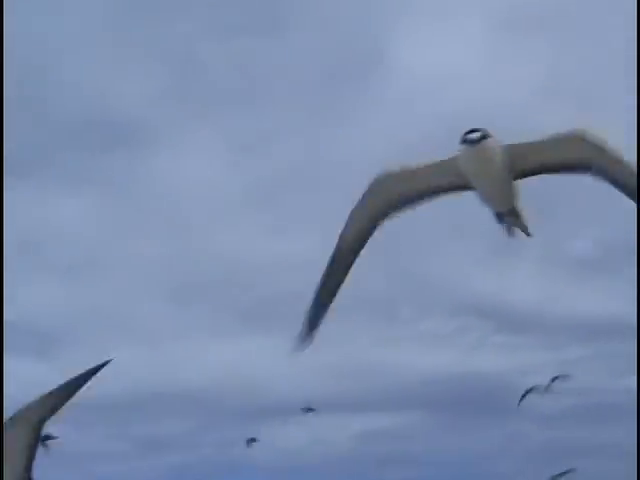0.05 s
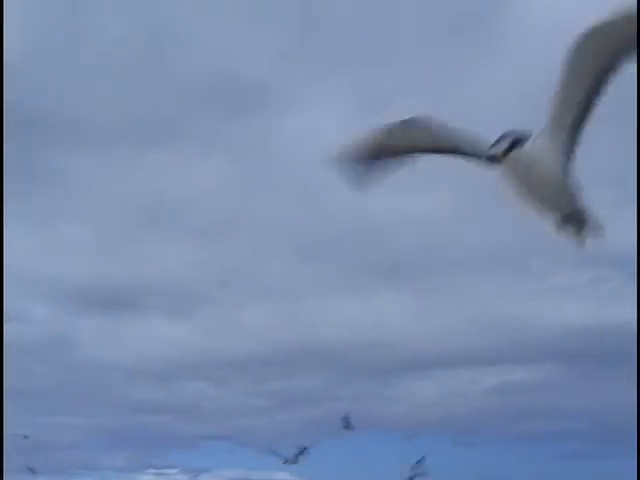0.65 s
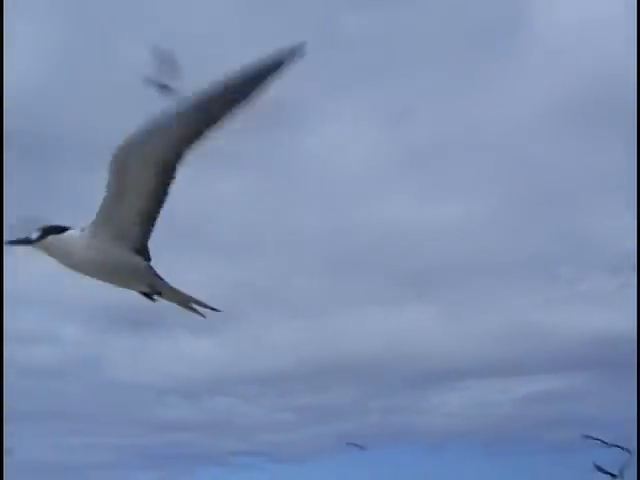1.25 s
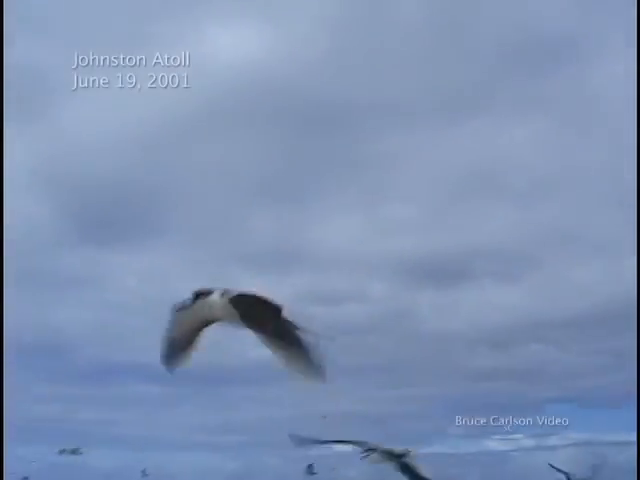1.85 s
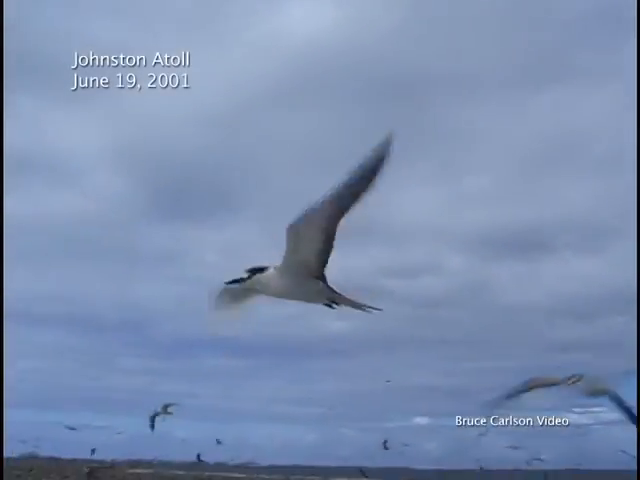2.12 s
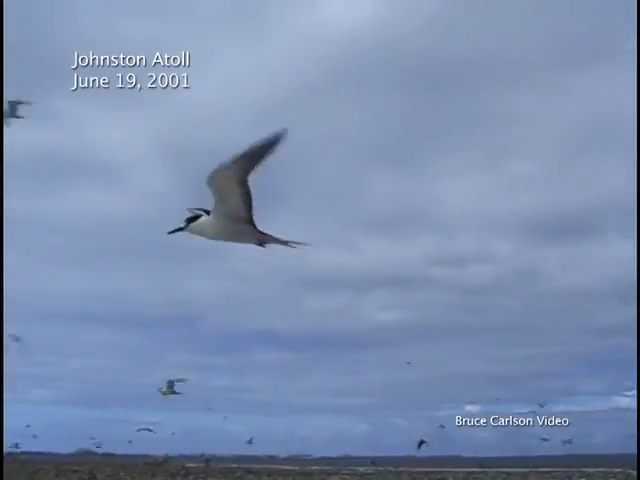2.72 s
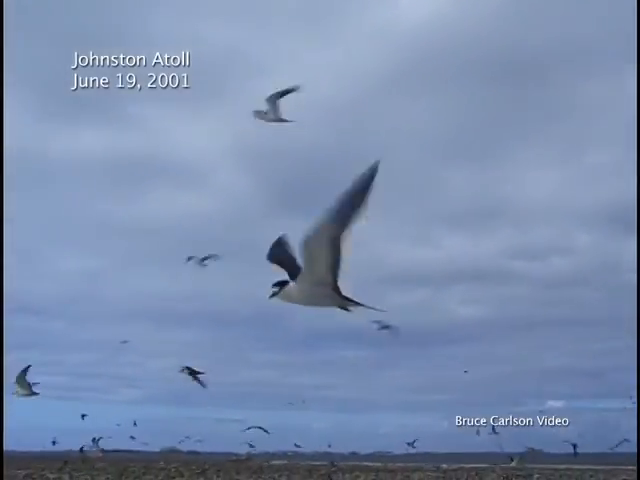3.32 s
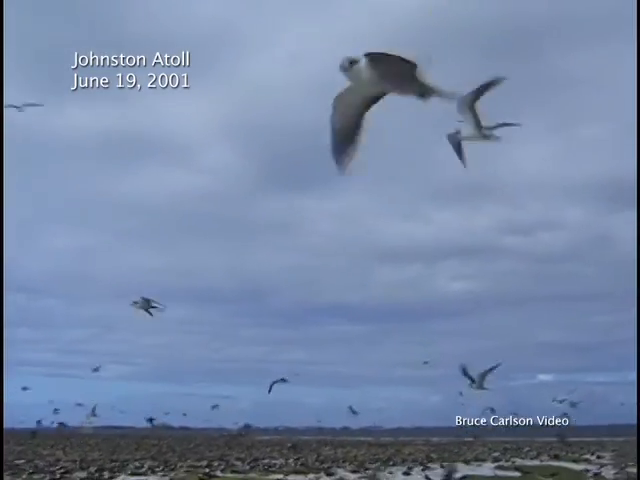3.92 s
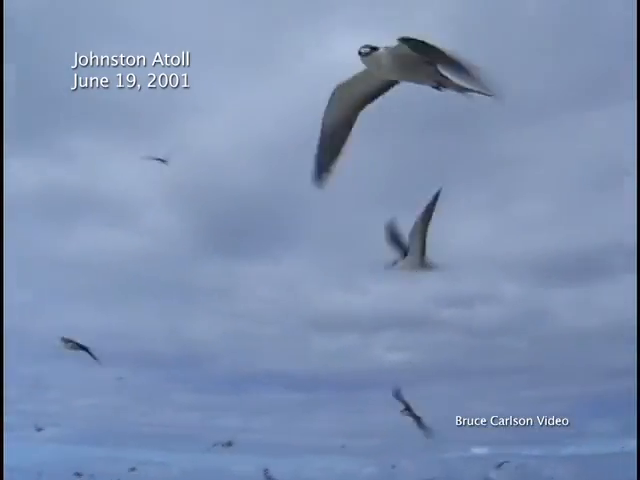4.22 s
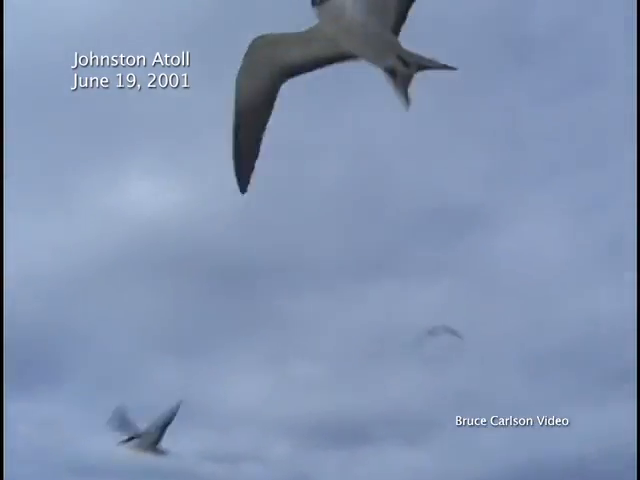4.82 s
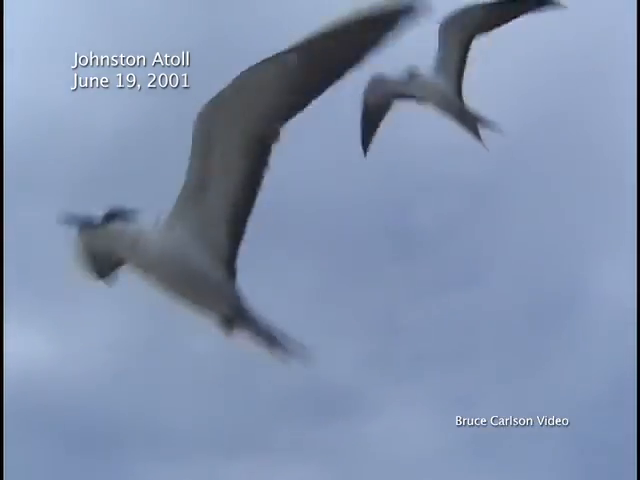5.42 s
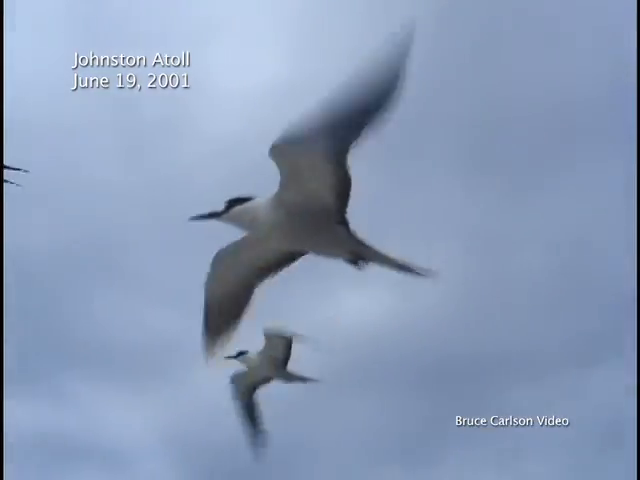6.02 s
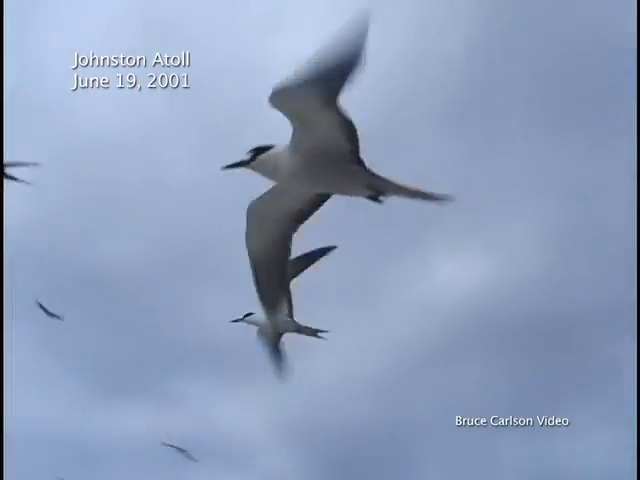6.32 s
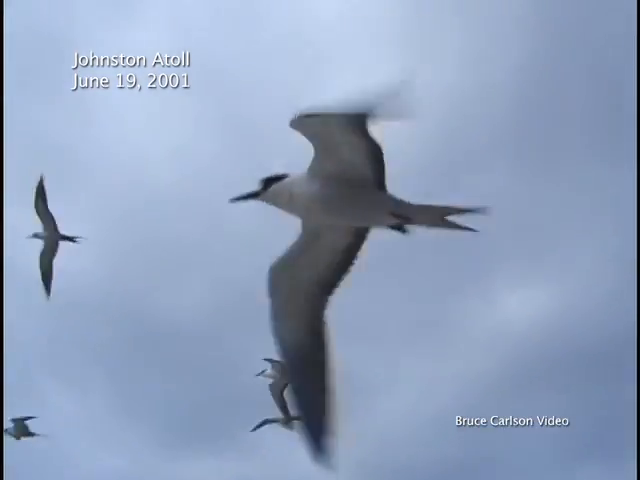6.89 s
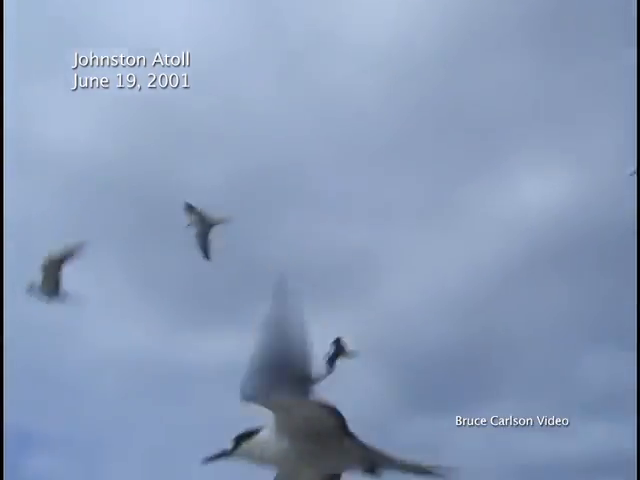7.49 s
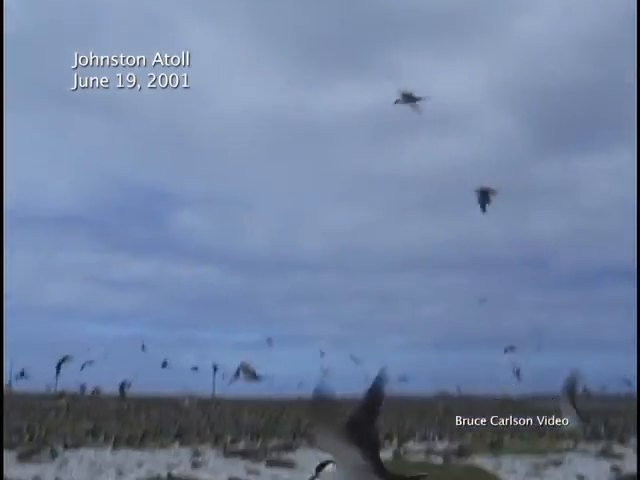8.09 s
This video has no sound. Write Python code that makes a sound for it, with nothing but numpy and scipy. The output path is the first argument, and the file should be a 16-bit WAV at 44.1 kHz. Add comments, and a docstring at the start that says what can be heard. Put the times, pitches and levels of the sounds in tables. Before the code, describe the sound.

A crowded seabird colony chatters shrilly throughout, heard in the open air with almost no echo. Short, mostly rising hoots come from the nesting ground while terns near the microphone give sharp, nasal yelps that crack into rasps. One hoarse squawk leads into a rapid burst of calls, and after a calmer stretch louder cries return overhead. Soft, uneven wind sits beneath the birds.

```python
"""A tern colony on an open beach. From the start, hundreds of birds blend into a shrill chorus, light wind
brushes the microphone, far hoots murmur and near terns give nasal, gliding 'wide-a-wake' cries.
From 0.5 s nearer hoots rise from the nesting ground; from 1.3 s birds wheel right overhead, calling in
bouts; at 2.8 s comes one harsh squawk. Each voice is a syrinx buzz shaped by throat resonances."""
import sys
import numpy as np
from scipy import signal
from scipy.fft import rfft, irfft, next_fast_len
from scipy.io import wavfile
from scipy.ndimage import uniform_filter1d

SR = 44100
rng = np.random.default_rng(int(sys.argv[2]) if len(sys.argv) > 2 else 0)


def wav_record(signal):
    """Record a signal, one row per channel, as 16-bit PCM in the file named by sys.argv[1]."""
    frames = np.transpose(np.atleast_2d(signal))
    bounded = np.clip(frames, -1, 1)
    # unit amplitude maps onto the largest positive 16-bit level
    quanta = np.round(bounded * 32767).astype(np.int16)
    wavfile.write(sys.argv[1], SR, quanta)


N = 359415
TIME = np.arange(N) / SR

# tern throat heard from far off: f/Hz, gain/dB
DISTANT_THROAT = [(500, -16.5), (1000, -38), (1320, -7.5), (1600, -31.5), (1950, -2.5), (2550, 4.5),
                  (3100, -4.5), (3800, -13), (4900, -14.5), (6200, -20), (7400, -22.5), (9500, -36.5),
                  (12500, -43), (15000, -96)]
# band that a bird's treble lifts: f/Hz, share/0-1
TREBLE_SHARE = [(3000, 0.01), (4800, 0.68), (7800, 0.87), (10000, 0.88)]


def undb(db):
    """Decibels to gain."""
    return 10 ** (np.asarray(db) / 20)


def unit(x):
    """Scale to rms 1."""
    return x / np.sqrt(np.mean(x ** 2) + 1e-18)


def curves(table, t=TIME):
    """Each column of a timed table, interpolated at times t."""
    times_s, *columns = np.transpose(table)
    return [np.interp(t, times_s, column) for column in columns]


def add(track, start_s, x):
    """Mix x into a track from start_s on."""
    i = int(start_s * SR)
    a, b = max(i, 0), min(i + len(x), N)
    if b > a:
        track[a:b] += x[a - i:b - i]


def walk(n, rate_hz):
    """Smooth random drift, spread near 1."""
    u = np.arange(n) * rate_hz / SR
    knots = int(u[-1]) + 2
    return 1.177 * np.interp(u, np.arange(knots), rng.standard_normal(knots))


def bump(hz, centre_hz, width_hz):
    """Resonance curve, 1 at its centre."""
    return 1 / (1 + (2 * (hz - centre_hz) / width_hz) ** 2)


def steady(x, span_s=.1):
    """Hold the slow level near rms 1, leaving the quick flicker."""
    power = np.maximum(uniform_filter1d(x ** 2, int(span_s * SR)), 0)
    return x / np.sqrt(power + np.mean(power) / 20)


def colour(x, shape, scale=1, ripple_db=0, extra_db=lambda hz: 0):
    """Filter by a shape (f/Hz, gain/dB), f times scale; ripple gives each throat its own peaks."""
    n = next_fast_len(len(x) + 256, True)
    hz = np.arange(n // 2 + 1) * SR / n + 1
    knots_hz, knots_db = np.transpose(shape)
    ripple = np.interp(hz, np.linspace(0, SR / 2, 40), rng.standard_normal(40))
    ripple *= np.clip(hz / 3500, .5, 1.3)
    shape_db = np.interp(np.log(hz), np.log(knots_hz * scale), knots_db)
    gain = undb(shape_db + ripple_db * ripple + extra_db(hz))
    # resonances delay some harmonics, spreading each pulse over its cycle
    lag_s = .0012 * np.interp(hz, np.linspace(0, SR / 2, 30), rng.random(30))
    dispersion = np.exp(-2j * np.pi * np.cumsum(lag_s) * SR / n)
    return irfft(rfft(x, n) * gain * dispersion, n)[:len(x)]


def syrinx(length_s, pitches_hz, rough, fade_s=.005, jitter=.036, breathy=.18, wobble=.009):
    """One buzzing syllable on an arched glide; roughness shakes pulse period and size and adds breath."""
    n = int((max(length_s, .01) + fade_s) * SR)
    u = np.linspace(0, 1, n)
    start, middle, end = pitches_hz
    glide_hz = start + (end - start) * u + (4 * middle - 2 * start - 2 * end) * u * (1 - u)
    pitch_hz = glide_hz * (1 + rough * jitter * walk(n, 450) + wobble * walk(n, 69.87))
    half_phase = np.pi * np.cumsum(pitch_hz) / SR
    harmonics = int(SR / 3 / middle)
    pulses = np.sin((2 * harmonics + 1) * half_phase) / np.sin(half_phase) - 1
    flutter = 1 + rough * .6 * walk(n, 700)
    breath = rough * breathy * rng.standard_normal(n) * (1 + np.cos(2 * half_phase))
    envelope = signal.windows.tukey(n, min(2 * fade_s * SR / n, 1)) * (1 - .5 * u ** 4)
    voice = (unit(pulses) * flutter + breath) * envelope
    return np.pad(voice, (0, SR // 250))  # time for the throat to ring out


def flock(count=300, pitch_spread=.14, throat_spread=.058, distance_db=2.6, stutter_db=3):
    """Many birds vary one three-part cry, each with its own pitch, pace, throat and distance."""
    # cry before each bird's stretch and shift: t/s, length/s, start f/Hz, middle f/Hz, end f/Hz, level/dB
    phrase = [(0, 0.089, 657.7, 736.2, 912.4, 6), (0.129, 0.085, 999.4, 872, 781.5, 2.5),
              (0.191, 0.11, 808.2, 838, 828.7, 3)]
    out = np.zeros(N)
    for k, (pitch, pace, throat, near) in enumerate(rng.standard_normal((count, 4))):
        begin_s = (k + rng.random()) / count * (N / SR + .3) - .3
        stretch = .85 * np.exp(.25 * pace)
        for offset_s, length_s, *pitches_hz, db in phrase:
            own_hz = np.array(pitches_hz) * np.exp(pitch_spread * pitch + .07 * rng.standard_normal(3))
            buzz = syrinx(length_s * stretch * .75, own_hz, rough=.3, wobble=.018)
            cry = colour(buzz, DISTANT_THROAT, np.exp(throat_spread * throat), ripple_db=4)
            level_db = db + distance_db * np.clip(near, -2, .4) + stutter_db * walk(len(cry), 80)
            add(out, begin_s + offset_s * stretch, unit(cry) * undb(level_db))
    return out


def churrs(count=45, pitch_hz=638, pitch_spread=.018, length_s=.13, distance_db=3):
    """Other birds of the crowd hold low, flat, nasal notes near one pitch."""
    out = np.zeros(N)
    for k, (pitch, slide, span, near) in enumerate(rng.standard_normal((count, 4))):
        own_hz = pitch_hz * np.exp(pitch_spread * (pitch + slide * np.array([-1, 0, 1])))
        buzz = syrinx(length_s * np.exp(span / 4), own_hz, rough=.41, fade_s=.02)
        note = colour(buzz, DISTANT_THROAT, ripple_db=3)
        start_s = (k + rng.random()) / count * N / SR - length_s
        add(out, start_s, unit(note) * undb(distance_db * np.clip(near, -2, 1)))
    return out


def chorus(body_gain_db=-.3, treble_gain_db=8.5, churr_db=3, blur_db=-11, split_hz=3800):
    """Flock and churrs over a blur of the farthest birds; swells and brightens as birds come closer."""
    # colony activity, before the gains: t/s, body level/dB, treble level/dB
    activity = [(0.0, -21.5, -34), (0.11, -25.5, -35.5), (0.27, -24, -35.5), (0.36, -35.5, -43),
                (0.5, -26, -37), (0.66, -24, -39), (1.11, -26, -41), (1.56, -23, -37), (1.85, -24.5, -39),
                (2.15, -24, -39.5), (2.45, -21.5, -42), (2.72, -22, -44), (3.11, -24, -27),
                (3.3, -27.5, -41.5), (3.6, -23.5, -40.5), (4.15, -31, -44.5), (4.34, -24, -38),
                (4.79, -26, -37.5), (5.01, -22, -32), (5.33, -21.5, -37), (5.74, -24, -33.5),
                (5.9, -26.5, -43.5), (6.58, -26, -34), (6.81, -22.5, -35), (7.0, -21.5, -36),
                (7.33, -23, -34.5), (7.42, -29.5, -45), (7.64, -28, -42.5), (8.15, -32.5, -40)]
    # narrow resonances through the whole chorus: f/Hz, width/Hz, gain/dB
    rings = [(1960, 14, -1.5), (2490, 46, 0.5), (4850, 58, 10.5)]
    body_db, treble_db = curves(activity)
    blur = undb(blur_db) * unit(colour(rng.standard_normal(N), DISTANT_THROAT))
    voices = steady(flock() + undb(churr_db) * churrs()) + blur
    for hz, width_hz, db in rings:
        ring = signal.lfilter(*signal.iirpeak(hz, hz / width_hz, fs=SR), voices)
        voices += (undb(db) - 1) * ring
    treble = signal.sosfiltfilt(signal.butter(2, split_hz, "high", fs=SR, output="sos"), voices)
    return (voices - treble) * undb(body_db + body_gain_db) + treble * undb(treble_db + treble_gain_db)


def wind(gain_db=-2.5, gust_db=2):
    """A light breeze rumbles unevenly on the microphone."""
    # rumble spectrum: f/Hz, relative density/dB
    spectrum = [(15, -25), (45, 3.5), (100, 2), (130, -2), (152, 3), (185, -5.5), (330, -7), (700, -18.5),
                (2000, -34), (12000, -75)]
    # breeze strength: t/s, level/dB
    breeze = [(0.0, -44), (0.45, -48), (2.31, -54.5), (2.52, -38), (2.63, -47), (3.33, -49), (3.81, -42),
              (4.02, -49), (4.45, -36), (4.74, -45.5), (4.9, -37.5), (5.2, -45.5), (6.76, -45.5),
              (6.83, -35.5), (6.88, -47), (7.15, -40.5), (7.47, -53.5), (7.88, -48), (7.94, -38),
              (8.15, -39)]
    rumble = unit(colour(rng.standard_normal(N), spectrum))
    return rumble * undb(curves(breeze)[0] + gain_db + gust_db * walk(N, 13))


def hoots(far_count=150, arch=.02045, swell_db=3):
    """Low, hoarse calls from the nesting ground, mostly rising: near ones swell over many far ones."""
    # near hoots: t/s, length/s, start f/Hz, end f/Hz, level/dB
    calls = [(.55, 0.099, 464, 542, -41), (0.801, .12, 422, 568, -35.5), (0.898, .09, 541, 673, -44),
             (1.11, 0.056, 443, 547, -42.5), (1.669, 0.098, 439, 538, -41.5), (2.192, 0.084, 432, 550, -37),
             (2.33, 0.074, 490, 533, -35), (2.4, .11, 451, 501, -38.5), (2.689, 0.077, 439, 504, -36.5),
             (2.783, .1, 478, 576, -32), (2.948, 0.07, 603, 489, -35), (3.23, 0.06, 444, 553, -39.5),
             (3.432, 0.11, 442.4, 553, -34.5), (3.542, 0.13, 506, 604, -33.5),
             (3.661, 0.043, 599, 448, -34.5), (3.821, 0.074, 572, 506, -38.5),
             (4.24, 0.079, 544, 477, -35.5), (4.331, 0.17, 528, 607, -35.5),
             (4.5, 0.077, 486, 544.4, -36.5), (4.66, 0.087, 401, 471, -38.5), (4.768, .11, 590, 564, -34.5),
             (5.277, 0.113, 640, 673, -35.5), (5.699, 0.12, 423, 547, -40.5),
             (5.919, 0.069, 512, 602, -39.5), (6.028, 0.088, 502, 580, -41), (6.249, .13, 577, 692, -36.5),
             (6.38, .14, 441.4, 586, -37), (6.788, .07, 444, 548, -37), (7.08, 0.067, 470, 519, -39.5),
             (7.19, 0.058, 438, 506, -39), (7.298, 0.084, 530, 567, -41), (7.849, 0.064, 450, 513, -39),
             (8.061, 0.093, 571, 672, -40)]
    # hooting throat: f/Hz, gain/dB
    throat = [(330, -25), (420, 3.5), (540, 1), (700, -3), (1000, -32), (1320, -8.5), (1600, -12),
              (1900, -14), (2600, -95), (4000, -16), (9000, -35.5)]
    # murmur of far hoots: t/s, level/dB
    murmur = [(0.0, -45.5), (0.7, -39.5), (1.05, -46), (1.79, -43.5), (2.45, -40.5), (3.15, -42.5),
              (4.4, -41.5), (5.5, -41), (7.1, -38.5), (7.55, -47), (8.15, -43)]
    near, far = np.zeros(N), np.zeros(N)
    for start_s, length_s, start_hz, end_hz, db in calls:
        pitches_hz = start_hz, (start_hz + end_hz) / 2 * (1 + arch), end_hz
        buzz = syrinx(length_s, pitches_hz, rough=1, fade_s=.015, jitter=.025, wobble=.018)
        hoot = colour(buzz, throat, ripple_db=2)
        push_db = np.interp(np.linspace(0, 1, len(hoot)), [0, .7, 1], [-4, 0, -1])
        hoot *= undb(push_db + swell_db * walk(len(hoot), 74.6))
        add(near, start_s - .007, unit(hoot) * undb(db))
    for k, (when, pitch, span, rise) in enumerate(rng.random((far_count, 4))):
        pitches_hz = (440 + 190 * pitch) * (1 + (.3 * rise - .12) * np.array([-1, 0, 1]))
        buzz = syrinx(.04 + .07 * span, pitches_hz, rough=1, fade_s=.02, wobble=.035)
        add(far, (k + when) / far_count * N / SR - .1, buzz)
    return near + unit(colour(far, throat)) * undb(curves(murmur)[0])


def near_terns(gain_db=1.13, bill_db=11, rise_db=5, quaver_db=1.8, pivot_hz=788):
    """Close birds: each harmonic flares as it glides through the bill resonance."""
    # syllables: t/s, length/s, pitch/Hz, glide/octaves, level/dB, bill resonance/Hz, treble/dB
    syllables = [(.01, 0.033, 959, 0.51, -24, 3240, -16), (0.047, 0.076, 1069, 0.21, -24, 3220, -1.5),
                 (0.156, 0.042, 944, -0.65, -25.5, 3100, 1), (0.195, 0.082, 943, 0.1, -28.5, 2530, -13),
                 (0.451, 0.09, 900, 0.2, -31, 2900, 5.5), (0.546, 0.07, 1200, 0.27, -30, 2400, 7),
                 (0.636, 0.11, 870, -0.13, -29.5, 2250, 5.5), (1.051, 0.031, 808, 0.44, -31, 2490, -1),
                 (1.487, 0.06, 653, 0.19, -27.5, 2420, 7), (1.547, 0.034, 1000, 0.14, -27, 2790, 5),
                 (1.631, 0.072, 666, 0.28, -23.5, 2380, -2), (1.706, 0.11, 727, 0.12, -25.5, 2900, 5),
                 (1.958, 0.076, 736, 0.71, -27, 2100, 1.5), (2.227, 0.076, 596, 0.24, -26.5, 2330, 3),
                 (2.28, 0.07, 767, 0.43, -23.5, 2630, 10), (2.358, 0.056, 800, 0.0048, -24, 2660, 6.5),
                 (2.416, 0.072, 701, 0.5, -23, 2570, 6), (2.497, 0.025, 896, -0.65, -25.5, 2420, 13.5),
                 (2.528, 0.064, 789, -0.025, -27.5, 2360, -3), (3.552, 0.065, 720, 0.37, -33, 3550, 10.5),
                 (3.865, 0.06, 954, 0.27, -32.5, 2950, -1), (4.12, 0.087, 794, 0.55, -30, 2140, -18),
                 (4.201, 0.034, 769, -0.031, -26.5, 3020, -1), (4.23, 0.073, 1020, 0.24, -27, 3050, -1),
                 (4.416, 0.093, 615, 0, -30, 2960, 4.5), (4.803, 0.042, 621, -0.13, -25, 2380, 5.5),
                 (4.892, 0.03, 900, 0.43, -27.5, 2520, 8), (4.951, 0.11, 641.5, 0.064, -22, 2300, -1.5),
                 (5.007, 0.054, 670, -0.11, -34, 3270, -4), (5.059, 0.054, 754, 0.47, -28, 2870, 0),
                 (5.134, 0.088, 674, -0.06, -31.5, 2470, 1), (5.157, 0.018, 772, 0.049, -23, 2340, -10),
                 (5.211, 0.028, 830, 0.76, -31.5, 3200, 3), (5.263, 0.084, 814, -0.055, -31, 2380, 7),
                 (5.325, 0.074, 668, 0.063, -28.5, 2530, -22), (5.577, 0.065, 747, 0.18, -27.5, 2280, -6),
                 (6.013, 0.088, 654, 0.19, -30.5, 1970, -26.5),
                 (6.219, 0.061, 620, -0.15, -29.5, 2600, 6.5), (6.314, 0.051, 634, 0.072, -29.5, 1887, 8),
                 (6.825, 0.048, 937, -0.7, -22.5, 2730, -4), (6.898, 0.037, 823, 0.037, -25, 3100, -6),
                 (7.045, 0.042, 814, 0.13, -31, 2410, -12), (7.14, 0.02, 818, -0.15, -23.5, 2480, -20),
                 (7.333, 0.046, 866, 1, -23.5, 3080, 1)]
    # throat without the bill resonance: f/Hz, gain/dB
    throat = [(450, -3.5), (750, -14), (1100, -20), (1450, -11.5), (1900, -1), (2550, 2), (3100, -1.5),
              (3800, -7.5), (4900, -8.5), (6200, -16), (7600, -18), (9800, -32.5), (12500, -43.5),
              (15000, -59)]
    # nasal resonance against pitch: pitch/Hz, gain/dB
    nasality = [(620, 12), (750, -2), (850, -56), (1000, -14)]
    out = np.zeros(N)
    for start_s, length_s, pitch_hz, glide_oct, db, bill_hz, treble_db in syllables:
        fade_s = .1 * length_s
        height_oct = np.log2(pitch_hz / pivot_hz)
        arch_oct = .157 * height_oct  # high syllables arch, low ones sag
        pitches_hz = pitch_hz * 2 ** np.array([-glide_oct / 2 - arch_oct, 0, glide_oct / 2 - arch_oct])
        # shrill or steep syllables are harsher, high ones purer
        rough = np.clip(.26 + .013 * max(treble_db, 0) + .42 * abs(glide_oct) - .36 * height_oct, 0, 1)
        buzz = syrinx(length_s, pitches_hz, rough, fade_s, wobble=.016)
        buzz *= undb(rise_db * glide_oct * np.linspace(-1, 1, len(buzz)))  # pressed harder when high
        buzz *= undb(quaver_db * walk(len(buzz), 100))
        nasal_db = np.interp(pitch_hz, *np.transpose(nasality))

        def timbre_db(hz):
            return (bill_db * bump(hz, bill_hz, width_hz=550)
                    + nasal_db * bump(hz, centre_hz=1340, width_hz=300)
                    + treble_db * np.interp(hz, *np.transpose(TREBLE_SHARE)))

        cry = colour(buzz, throat, ripple_db=3, extra_db=timbre_db)
        add(out, start_s - fade_s / 2, undb(db + gain_db) * unit(ground_echo(cry)))
    return out


def ground_echo(x, share=.45, max_lag_s=.004, doppler=.012):
    """Sand returns a flying bird's cry late and off pitch, so each harmonic beats at its own rate."""
    i = np.arange(len(x) + int(2 * max_lag_s * SR))
    speed = 1 + doppler * rng.uniform(-1.106, 1)
    lag_s = max_lag_s * rng.uniform(.485, 1)
    echo = np.interp(i * speed - lag_s * SR, np.arange(len(x)), x, left=0, right=0)
    return np.pad(x, (0, len(i) - len(x))) + share * echo


def beach_scatter(x, scatter_db=-19, decay_s=.031):
    """Open ground gives back only a short, weak scatter."""
    t = np.arange(SR // 4) / SR
    tail = rng.standard_normal(len(t)) * np.exp(-t / decay_s) * (t > .004)
    return x + undb(scatter_db) * signal.fftconvolve(x, tail / np.linalg.norm(tail))[:N]


def overhead_terns(bill_db=10, harsh_db=7, jitter=.045, wobble=.006, rasp=.45):
    """Clean nasal harmonics slide through a moving bill resonance and crack into a bright rasp."""
    # per cry: upper throat resonance (f/Hz, width/Hz, gain/dB),
    # then a curve (t/s, pitch/Hz, level/dB, bill resonance/Hz, roughness/0-1)
    cries = [ ((7500, 5300, 19), [(1.265, 915, -34, 2700, .2), (1.28, 915, -27, 2700, .1),
             (1.305, 885, -25.5, 2605, 0.2), (1.325, 922, -29, 2900, .4), (1.335, 1035, -24, 3000, 0.4),
             (1.355, 1110, -29, 3200, 0.42), (1.368, 1003, -29, 2900, .5), (1.385, 1060, -24, 3000, 0.4),
             (1.398, 1080, -38, 3000, .4)]), ((5600, 920, 11), [(1.413, 922, -25, 2700, 0.74),
             (1.425, 891, -18, 2650, 0.65), (1.44, 858, -25, 2550, .6), (1.452, 781, -17, 2390, 0.1),
             (1.465, 833, -30, 3300, 0.33), (1.485, 905, -23, 3520, 0.2), (1.51, 875, -26, 2600, 0.4),
             (1.528, 820, -32, 2450, .4)]), ((5200, 590, 14.4), [(1.613, 1067, -44, 3200, .5),
             (1.624, 1053, -21.5, 3340, 0.42), (1.636, 998, -21, 2850, 0.43), (1.655, 820, -25, 2450, 0.2),
             (1.67, 790, -29, 2400, .5)]), ((5700, 920, 8), [(1.858, 920, -32, 2750, 0.57),
             (1.865, 913, -17, 2740, 0.53), (1.878, 891, -21, 2680, 0.54), (1.886, 820, -22.5, 2450, 0.4),
             (1.9, 747, -24, 2230, 0.3), (1.914, 740, -23, 2230, 0.17), (1.93, 768, -31, 2400, .4),
             (1.95, 828, -25, 3100, 0.2), (1.958, 806, -32, 2600, .5)]), ((7650, 4700, 26),
             [(2.96, 793, -38, 2400, .2), (2.985, 806, -25, 2500, .1), (3.003, 820, -36, 2500, 0.37),
             (3.018, 895, -25, 2700, 0.36), (3.04, 955, -29, 2900, 0.2), (3.06, 1050, -22.5, 3130, 0.5),
             (3.072, 1075, -44, 3250, .1)]), ((8100, 3800, 19), [(3.09, 1090, -40, 3300, .3),
             (3.098, 1070, -22, 5400, 0.5), (3.108, 1040, -23.5, 5200, 0.4), (3.122, 940, -39, 4600, .5)]),
             ((4000, 920, 7), [(3.07, 1075, -33, 3230, 0), (3.09, 1110, -27, 3330, 0),
             (3.113, 1150, -37, 3400, .3), (3.128, 885, -33, 3500, 0.65), (3.14, 1016, -25, 4000, 0.46),
             (3.152, 1033, -26, 3100, 0.88), (3.166, 1120, -22.5, 3350, 0.42),
             (3.186, 1089, -24, 3230, 0.54), (3.203, 920, -30, 2800, 1), (3.224, 1070, -24, 3200, 0.56),
             (3.238, 890, -26, 2740, 1), (3.268, 957, -21.5, 3030, .4), (3.292, 905, -24, 3070, .4),
             (3.312, 789, -32, 2400, .5)]), ((3600, 1100, 9.9), [(3.322, 817, -35, 2450, .5),
             (3.346, 1080, -29, 3240, 0.33), (3.37, 950, -44, 2910, .8), (3.393, 1080, -27, 3240, .3),
             (3.412, 887, -26, 2700, .35), (3.425, 896, -29, 2700, 0.76), (3.442, 1010, -24.5, 3000, .4),
             (3.457, 930, -35, 2800, .8), (3.468, 990, -24, 2950, .35), (3.495, 786, -27, 2400, .4)]),
             ((4050, 1200, 9.3), [(5.625, 666, -34, 3180, 0.1), (5.645, 678, -23, 3370, 0.2),
             (5.668, 677, -23, 3400, .05), (5.688, 638, -25, 2600, .15), (5.702, 685, -25, 3400, .3),
             (5.72, 728, -27.5, 3600, 0.4), (5.735, 795, -22.5, 4140, .5), (5.749, 828, -22.5, 4270, .5),
             (5.759, 835, -42, 3600, .5)]), ((5100, 560, 6.6), [(5.775, 932, -34, 3672, .5),
             (5.782, 956, -19.5, 3870, 0.4), (5.793, 884, -24, 2580, 0.46), (5.801, 856, -11.5, 2560, 0.06),
             (5.81, 882, -21, 2600, 0.5), (5.825, 841, -22.5, 2520, .1), (5.846, 858, -19.5, 2560, 0.2),
             (5.868, 897, -27, 3460, .3), (5.89, 856, -21, 2500, .7), (5.905, 835, -23, 2500, 0.8),
             (5.917, 790, -35, 2500, 0.3)]), ((5500, 290, 13), [(6.638, 696, -25, 2150, 0.2),
             (6.65, 742, -25, 2227, 0.21), (6.675, 800, -26, 2450, 0.1), (6.7, 907, -12, 2730, 0),
             (6.712, 834, -27, 2600, 0.5), (6.73, 736, -21, 3030, 0.05), (6.75, 790, -30, 2610, 0.6),
             (6.76, 888, -13.5, 2680, 0.34), (6.775, 937, -16, 2790, 0.2), (6.793, 965, -17, 2880, 0.3),
             (6.803, 904, -28, 2700, 0.52)]), ((3700, 700, 8.3), [(7.198, 720, -23, 2420, 0.85),
             (7.204, 745, -20.5, 2450, 0.5), (7.218, 806, -21, 2610, 0.57), (7.229, 879, -12.5, 2738, .6),
             (7.241, 960, -23, 2900, 0.3), (7.258, 986, -24, 3000, 0.06), (7.272, 976, -16, 2900, 0.3),
             (7.287, 870, -25, 2600, 0.5)]), ((3630, 820, 9), [(7.402, 1130, -29, 3400, 0.7),
             (7.412, 1095, -19, 3300, 0.6), (7.418, 1030, -19, 3600, .6), (7.423, 983, -10.5, 2950, 0.3),
             (7.431, 927, -22, 2870, 0.8), (7.445, 942, -25, 2880, 0.3), (7.456, 982, -18.5, 2920, 0),
             (7.478, 987, -32, 3000, 0.1), (7.491, 991, -15, 2940, 0), (7.512, 840, -31, 2700, 0.8)]),
             ((8500, 520, 3), [(7.71, 590, -26, 1800, 0.1), (7.724, 711, -25, 1550, 0.02),
             (7.76, 782, -27, 1850, 0), (7.78, 828, -16.5, 2530, 0.27), (7.79, 854, -17.5, 2480, 0.4),
             (7.796, 821, -10.5, 2500, 0.4), (7.803, 764, -31, 2340, 0.5), (7.812, 734, -26, 1700, 0.14),
             (7.843, 755, -31, 1800, 0.18), (7.853, 825, -18, 2450, .6), (7.862, 965, -18, 2450, .6),
             (7.883, 895, -35, 2290, 0.84), (7.893, 953, -17.5, 2050, 0.1), (7.906, 959, -17.5, 2180, 0),
             (7.919, 964, -18, 1970, 0.44), (7.936, 690, -37, 1900, .8)])]
    # throat without the bill resonance: f/Hz, gain/dB
    throat = [(450, -9), (750, -12), (1000, -25), (1450, -8.5), (1900, -9), (2550, 5), (3100, -2),
              (3900, -12), (4800, -5.5), (5600, -15), (7300, -14.5), (9500, -29.5), (12500, -37.5),
              (15000, -60)]
    throat_hz, throat_db = np.transpose(throat)
    harmonic = np.arange(1, 17)[:, None]
    out = np.zeros(N)
    for (upper_hz, upper_width_hz, upper_db), cry in cries:
        t = np.arange(cry[0][0], cry[-1][0], 1 / SR)
        n = len(t)
        pitch_hz, db, bill_hz, rough = curves(cry, t)
        shaken_hz = pitch_hz * (1 + jitter * rough * walk(n, 700) + wobble * walk(n, 150))
        phase = 2 * np.pi * np.cumsum(shaken_hz) / SR
        hz = harmonic * pitch_hz
        treble_db = harsh_db * rough + .26 * (db + 20)  # brighter when rough or loud
        gains = undb(np.interp(np.log(hz), np.log(throat_hz), throat_db)
                     + bill_db * bump(hz, bill_hz, width_hz=600)
                     + upper_db * bump(hz, upper_hz, upper_width_hz)
                     + treble_db * np.interp(hz, *np.transpose(TREBLE_SHARE)))
        partials = gains * np.sin(harmonic * phase + 2 * np.pi * rng.random(harmonic.shape))
        voice = partials.sum(axis=0) / np.sqrt(np.sum(gains ** 2, axis=0) / 2)
        flutter = 1 + rasp * rough * walk(n, 900)
        add(out, t[0], voice * flutter * undb(db) * signal.windows.tukey(n, .04))
    return out


def squawk(start_s=2.78, peak_s=2.925, end_s=3.0, level_db=-25):
    """One hoarse bird: ragged pulses ring a wide throat, swell and die away."""
    # throat resonances: f/Hz, width/Hz, gain/dB
    resonances = [(684, 570, 1), (1350, 310, 9.5), (2193, 770, 13.5), (2480, 180, 1), (4060, 450, 4.5)]
    length_s = end_s - start_s
    buzz, cry = np.zeros(N), np.zeros(N)
    add(buzz, start_s, syrinx(length_s, pitches_hz=(560, 760, 600), rough=1, jitter=.075, breathy=.15))
    for hz, width_hz, db in resonances:
        band = signal.butter(3, [hz - width_hz / 2, hz + width_hz / 2], "band", fs=SR, output="sos")
        cry += undb(db) * signal.sosfilt(band, buzz)
    cry *= undb(np.interp(TIME, [start_s, peak_s, end_s], [-13, 0, -20]))
    return unit(cry) * np.sqrt(length_s * SR / N) * undb(level_db)


def scene():
    """All the birds in open air, with the breeze; mono."""
    close_birds = beach_scatter(overhead_terns() + near_terns() + squawk())
    return (close_birds + chorus() + hoots() + wind())[None]


def record(dry, top_hz=14400):
    """The recorder cuts the top with a steep low-pass."""
    return signal.sosfilt(signal.ellip(8, .2, 70, top_hz, fs=SR, output="sos"), dry)


dry = scene()
out = record(dry)
wav_record(out)
```